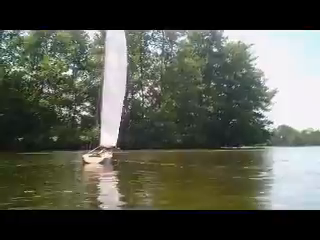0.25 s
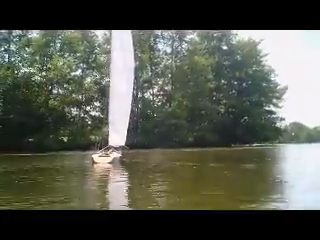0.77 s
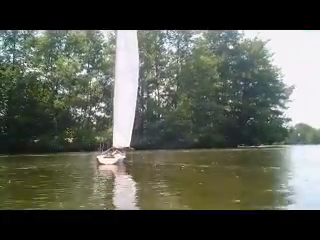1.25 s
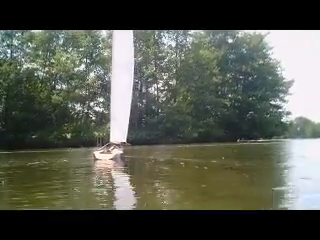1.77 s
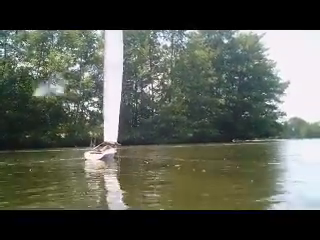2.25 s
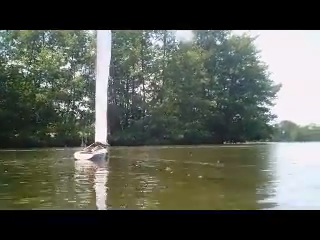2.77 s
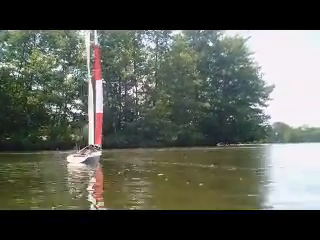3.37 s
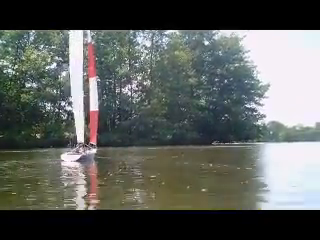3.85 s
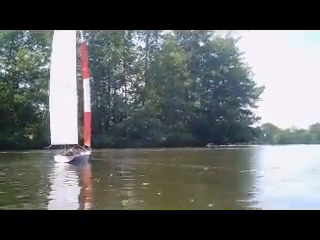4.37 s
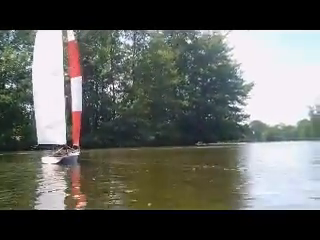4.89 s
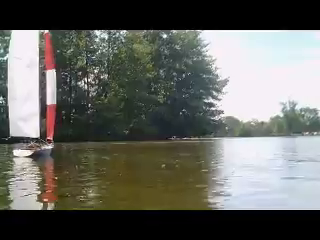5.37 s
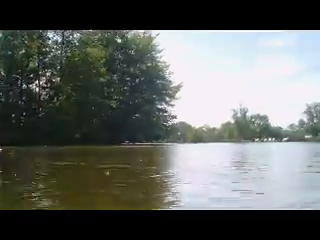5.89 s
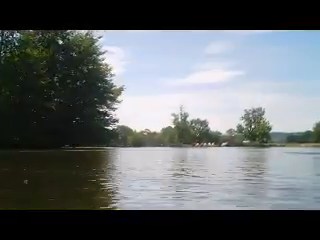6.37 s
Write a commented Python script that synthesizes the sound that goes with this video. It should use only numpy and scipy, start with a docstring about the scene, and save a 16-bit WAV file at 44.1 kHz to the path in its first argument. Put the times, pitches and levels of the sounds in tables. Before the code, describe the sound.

A small electric model boat motor drones steadily on a lake, shaking a loose camera housing that buzzes, rattles and ticks.

```python
"""A small electric boat motor runs at a steady speed on a lake, heard from a camera on the hull.
From the start the shaft hums and shakes the loose camera housing, which buzzes with one knock a turn
and ticks now and then. From about 3 s the housing bounces, landing hard only every few turns, while a
faint whine, like a steering servo, glides up and down twice. By 6 s the even buzz is back.
All along, the camera samples slowly and holds each sample, which adds a gritty treble."""
import sys
import numpy as np
from scipy import signal
from scipy.fft import rfft, irfft, next_fast_len
from scipy.io import wavfile
from scipy.ndimage import map_coordinates

SR = 44100
rng = np.random.default_rng(int(sys.argv[2]) if len(sys.argv) > 2 else 0)


def wav_record(signal):
    """Record a signal, one row per channel, as 16-bit PCM in the file named by sys.argv[1]."""
    frames = np.transpose(np.atleast_2d(signal))
    bounded = np.clip(frames, -1, 1)
    # unit amplitude maps onto the largest positive 16-bit level
    quanta = np.round(bounded * 32767).astype(np.int16)
    wavfile.write(sys.argv[1], SR, quanta)


N = 292383
T = np.arange(N) / SR
SHAFT_HZ = 46.935  # turns a second; a "harmonic" is a tone at a whole multiple of such a rate

# Levels in the tables are relative: the functions add their own gains.
# the servo's two glides: t/s, f/Hz, level/dB
SERVO_GLIDES = [(3.05, 236, -85), (3.25, 252, -54), (3.52, 272, -50), (3.7, 260, -53), (3.9, 238, -51),
                (4.1, 220, -59), (4.3, 225, -66), (4.55, 262, -55), (4.9, 263, -55), (5.25, 212, -58),
                (5.45, 200, -85)]
# the tones of its gears: harmonic number, level/dB
GEAR_TONES = [(4, -3), (5, 0), (6, -3), (7, -9)]
# how hard the boat shakes: t/s, hull level/dB, housing level/dB
SHAKING = [(0.0, -33, -36), (0.05, -30.5, -35), (1.73, -32, -34.5), (1.96, -27, -33), (2.3, -36.5, -37),
           (2.42, -29, -33), (2.69, -40, -34.5), (2.82, -30.5, -34), (5.2, -31.5, -36.5), (5.36, -33, -36),
           (5.55, -32, -37.5), (6.63, -28.5, -37)]
# the tone colour of the hull's rumble: f/Hz, level/dB
HULL_SPECTRUM = [(20, -39), (40, -59), (60, -4.5), (82, 3), (118, -2), (165, 0), (215, 2), (265, -4.5),
                 (315, -1), (380, -8), (470, -7), (620, -16), (800, -19.5), (1400, -47.5)]
# the shaft's strong harmonics: t/s, 2nd level/dB, 4th level/dB, 5th level/dB
STRONG_HUM = [(0.0, -29, -27.5, -50), (0.24, -32.5, -42, -36), (0.68, -36, -29.5, -34.5),
              (1.59, -32.5, -31, -41), (2.01, -32.5, -29.5, -26), (2.27, -34.5, -39.5, -42.5),
              (2.46, -31.5, -33, -27.5), (2.9, -38, -27, -32), (3.08, -31, -37, -34),
              (5.17, -33, -41, -38.5), (5.34, -42, -63, -36.5), (5.6, -30, -35.5, -32),
              (6.63, -32, -38, -34)]
# its weak harmonics: harmonic number, level/dB
WEAK_HUM = [(3, -45.5), (6, -40), (7, -40.5), (9, -45.5), (10, -48), (15, -48.5), (18, -50), (19, -45),
            (20, -43.5)]
# a small hard part hits the housing loudly: t/s, level/dB
LOUD_TICKS = [(0.638, -38), (0.834, -38), (1.094, -38), (1.409, -38), (1.947, -33.5), (2.024, -36),
              (2.475, -37), (2.512, -36.5), (2.688, -38), (2.985, -35), (3.152, -40), (3.589, -35.5),
              (3.666, -35), (3.92, -37), (4.219, -40), (4.298, -37.5), (5.101, -37), (5.382, -37),
              (5.637, -40), (6.238, -44), (6.362, -36)]
# spells in which that part keeps rattling: start/s, end/s
RATTLE_SPELLS = [(1.9, 2.1), (2.43, 3.03), (4.09, 4.37), (5.38, 5.75), (6.0, 6.55)]
# where that part rings: f/Hz, width/Hz, level/dB
TICK_RING = [(4560, 450, -0.5)]
# the tone colour of the housing's dry scraping: f/Hz, level/dB
SCRAPE_SPECTRUM = [(150, 17), (400, 19.5), (750, 16.5), (1150, 16.5), (1400, -17), (2000, -2.5),
                   (2900, -1.5), (3400, -5.5), (3700, -60), (4600, -19), (5300, -60)]
# the once-a-turn knocking, weak while the housing is loose: t/s, strength (0 to 1)
EVEN_KNOCKING = [(0, 0.66), (1.7, 0.55), (2.05, .91), (2.25, .62), (3.05, 0.84), (3.12, 0.44), (3.95, 0.47),
                 (4.1, .1), (5.3, 0.3), (5.42, 0.41), (5.72, 0.52), (5.8, 0.88), (6.63, 0.67)]
# single hard knocks of the housing: t/s, level/dB
HARD_KNOCKS = [(0.634, -36), (0.846, -33), (2.446, -32), (2.488, -32.5), (3.916, -39), (3.941, -34.5)]
# spells in which the housing bounces: start/s, end/s, gap between landings/turns
BOUNCE_SPELLS = [(3.172, 3.48, 1.6), (3.511, 3.78, 4), (3.783, 3.89, 2), (4.021, 4.82, 4), (4.85, 4.96, 2),
                 (4.981, 5.16, 4), (5.172, 5.36, 2)]
# small hops after a landing: delay/turns, level compared with the landing/dB
HOPS = [(1.152, -2.5), (1.8, -4)]
# the tones at which the housing rings: f/Hz, swell time/s, level/dB
HOUSING_TONES = [(921.6, 0.0049, 1), (1114, 0.0016, -6.5), (1570, 0.0079, -23), (1704, 0.0042, -22.5),
                 (2226, 0.0036, -15), (2746, 0.004, -16.5), (3290, 0.0022, -25), (4096, 0.0024, -14)]


def amp(db):
    """Turn decibels into a gain."""
    return 10 ** (np.asarray(db) / 20)


def unit(x):
    """Scale x to an average (rms) level of 1."""
    return x / np.sqrt(np.mean(x ** 2) + 1e-20)


def curves(rows):
    """Join a table's points with lines: one curve for each column after the time."""
    times, *columns = np.transpose(rows)
    return [np.interp(T, times, column) for column in columns]


def wobble(rate):
    """A smooth random curve through rate points a second."""
    return map_coordinates(rng.standard_normal(int(N * rate / SR) + 4), [T * rate])


def filtered(x, response):
    """Scale each frequency f in x by response(f)."""
    size = next_fast_len(N + SR // 2)
    return irfft(rfft(x, size) * response(np.fft.rfftfreq(size, 1 / SR)), size)[:N]


def noise(envelope, spectrum):
    """Noise at rms 1 that follows a loudness curve, coloured by rows of f/Hz, level/dB."""
    hz, db = np.transpose(spectrum)
    hiss = envelope * rng.standard_normal(N)
    return unit(filtered(hiss, lambda f: amp(np.interp(np.log(f + 1), np.log(hz), db))))


def ring(x, resonances):
    """Let x ring in resonances given as rows of f/Hz, width/Hz, level/dB."""
    return filtered(x, lambda f: sum(amp(db) * 1j * f * width / (hz * hz - f * f + 1j * f * width)
                                     for hz, width, db in resonances))


def impulses(times, sizes):
    """One spike of the given size at each time."""
    return np.bincount(np.clip(np.round(times * SR).astype(int), 0, N), sizes, N + 1)[:N]


def bursts(spikes, rise_s, hz=0):
    """Each spike swells for rise_s and dies away, swinging at hz."""
    t = np.arange(SR // 20) / SR
    swell = t / rise_s * np.exp(1 - t / rise_s)
    return signal.oaconvolve(spikes, swell * np.cos(2 * np.pi * hz * t))[:N]


def servo(waver=0.00443, flutter_db=3, teeth_db=2):
    """Gears whine faintly, rising and sagging, with the rush of their meshing teeth."""
    hz, db = curves(SERVO_GLIDES)
    phase = 2 * np.pi * np.cumsum(hz * (1 + waver * wobble(40))) / SR
    whine = sum(amp(level + flutter_db * wobble(25)) * np.sin(k * phase) for k, level in GEAR_TONES)
    teeth = amp(teeth_db) * noise(1, [(700, -28), (1150, 0), (1650, 8), (2100, -14), (4000, -47)])
    return amp(db) * (whine + teeth)


def hull(blows, loose_db=3, throb_depth=0.29, thump_db=-35, slosh_db=-51):
    """The hull rumbles in step with the shaft, thumps under each blow and rocks on the water."""
    looseness = .5 - curves(EVEN_KNOCKING)[0]
    rumble_db = curves(SHAKING)[0] + 1 + loose_db * looseness
    throb = 1 + throb_depth * np.cos(2 * np.pi * SHAFT_HZ * T + 1.65)
    rumble = amp(rumble_db) * noise(throb, HULL_SPECTRUM)
    slosh = amp(slosh_db + 4 * wobble(5.63)) * noise(1, [(15, -37), (55, 10), (200, -30.5)])
    thumps = amp(thump_db) * noise(bursts(blows, rise_s=0.0033), HULL_SPECTRUM)
    return rumble + thumps + slosh


def shaft_hum(waver=0.096):
    """The hull carries the shaft's harmonics; they waver more while the housing is loose."""
    looseness = 2 - curves(EVEN_KNOCKING)[0]

    def tone(k, flutter_db):
        """Harmonic k, unsteady in level and pitch."""
        gain = np.sqrt(2) * amp(flutter_db * wobble(12))
        phase = 2 * np.pi * (k * SHAFT_HZ * T + rng.random())
        return gain * np.sin(phase + waver * looseness ** 3 * wobble(14))

    second, fourth, fifth = curves(STRONG_HUM)
    levels = [(2, second), (4, fourth + 1), (5, fifth - 0.5)]
    strong = sum(amp(db) * tone(k, flutter_db=1) for k, db in levels)
    weak = sum(amp(db) * tone(k, flutter_db=3) for k, db in WEAK_HUM)
    return strong + weak / looseness


def ticks(loud_db=34, soft_db=-9, scatter_db=6, crowd_s=.015, jitter_s=.0003):
    """A small hard part hits the housing; soft ticks crowd around loud ones and fill the rattles."""
    times, db = np.transpose(LOUD_TICKS)
    slot_s = 1 / (5 * SHAFT_HZ)  # five chances to tick in each turn
    slots = np.arange(0, N / SR, slot_s)
    dice, size, delay = rng.random((len(slots), 3)).T
    to_loud_s = np.abs(slots[:, None] - times).min(axis=1)
    rattling = sum((slots > start) & (slots < end) for start, end in RATTLE_SPELLS)
    odds = .09 + .25 * rattling + .4 * np.exp(-to_loud_s / crowd_s)
    struck = (dice < odds) & (to_loud_s > slot_s / 2)
    soft = struck * amp(soft_db + scatter_db * (2 * size - 1))
    spikes = impulses(times, amp(db + loud_db)) + impulses(slots + jitter_s * delay, soft)
    ping = ring(ring(spikes, TICK_RING), TICK_RING)  # ringing twice narrows the pitch
    body = amp(-29) * ring(spikes, [(940, 990, 23.8), (2700, 930, 12.3)])
    return ping + body


def scrape(blows, rasp_db=-41, chatter_db=-7, grain_db=4, sing_db=-9):
    """The housing rasps at each blow and chatters softly, which keeps its lowest tone singing."""
    rasp = amp(rasp_db) * noise(bursts(blows, rise_s=0.0028), SCRAPE_SPECTRUM)
    chatter = amp(chatter_db) * noise(amp(grain_db * wobble(400)), SCRAPE_SPECTRUM)
    singing = amp(sing_db) * unit(ring(rng.standard_normal(N), [(924, 284, 0)]))
    return rasp + amp(curves(SHAKING)[1]) * (chatter + singing)


def bounces(base_db=-36, doubling_db=0.4, room_turns=.9):
    """Rows of t/s, level/dB: the housing lands harder after a longer flight and hops if there is room."""
    rows = []
    for start, end, turns in BOUNCE_SPELLS:
        landing_db = base_db + doubling_db * np.log2(turns / 2)
        pattern = [(0, 0)] + [(delay, db) for delay, db in HOPS if delay + room_turns < turns]
        for landing in np.arange(start, end, turns / SHAFT_HZ):
            hits = [(landing + delay / SHAFT_HZ, landing_db + db) for delay, db in pattern]
            rows += [(t, db) for t, db in hits if t < end]
    return rows


def housing_blows(scatter_db=1.83, lead_s=.0035, even_jitter_s=.0004, extra_jitter_s=.0005):
    """Times and sizes of the blows as the shaft shakes the housing: one a turn, plus knocks and bounces."""
    turns = np.arange(1, int(N / SR * SHAFT_HZ) + 1) / SHAFT_HZ
    even_shift, even_spread = rng.standard_normal((len(turns), 2)).T
    strength = np.interp(turns, T, curves(EVEN_KNOCKING)[0] * amp(curves(SHAKING)[1]))
    extras, extra_db = np.transpose(HARD_KNOCKS + bounces())
    extra_shift, extra_spread = rng.standard_normal((len(extras), 2)).T
    # a knock or bounce takes the place of its turn's blow
    strength *= np.abs(turns[:, None] - extras).min(axis=1) > .5 / SHAFT_HZ
    times = [turns - lead_s + even_jitter_s * even_shift, extras + extra_jitter_s * extra_shift]
    sizes = [strength * amp(scatter_db * even_spread), amp(extra_db + scatter_db * extra_spread)]
    return np.concatenate(times), np.concatenate(sizes)


def housing_buzz(times, sizes, ring_db=6, scatter_db=1, jitter_s=0.00014, rough_db=2):
    """Each blow rings all the housing's tones, and the rattling contact makes them rough."""
    buzz = np.zeros(N)
    for hz, swell_s, db in HOUSING_TONES:
        shift, spread = rng.standard_normal((len(times), 2)).T
        spikes = impulses(times + jitter_s * shift, sizes * amp(db + ring_db + scatter_db * spread))
        buzz += bursts(spikes, swell_s, hz) * amp(rough_db * wobble(hz / 8))
    return buzz


def scene():
    """Everything reaches the one microphone through the boat."""
    times, sizes = housing_blows()
    blows = impulses(times, sizes)
    boat = shaft_hum() + hull(blows)
    return (boat + housing_buzz(times, sizes) + scrape(blows) + ticks() + servo())[None]


def record(dry, hold=4, input_hz=5250, top_hz=12800):
    """The camera samples slowly and holds each value; the steps mirror the sound into the treble."""
    smooth = filtered(dry[0], lambda hz: 1 / np.sqrt(1 + (hz / input_hz) ** 80))
    steps = np.repeat(smooth[::hold], hold)[:N]
    return filtered(steps, lambda hz: hz < top_hz)[None]


dry = scene()
out = record(dry)
wav_record(out)
```